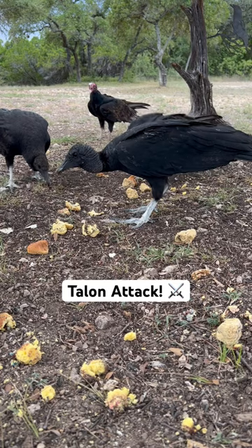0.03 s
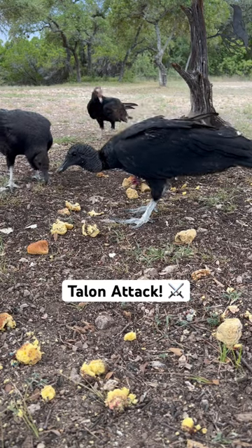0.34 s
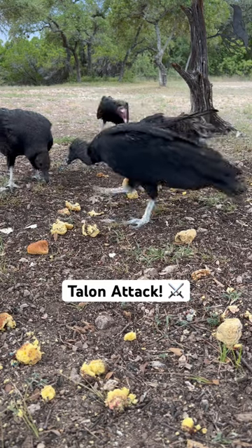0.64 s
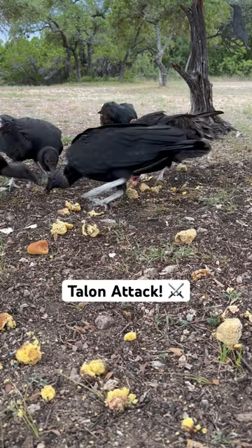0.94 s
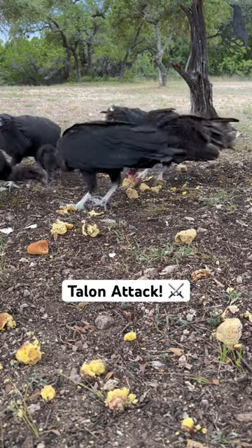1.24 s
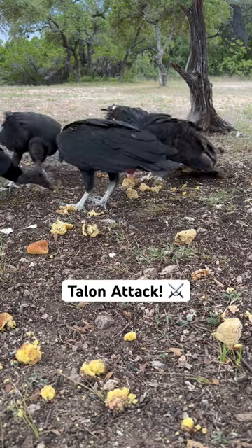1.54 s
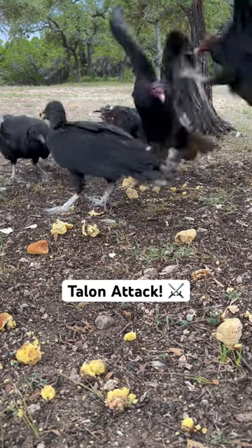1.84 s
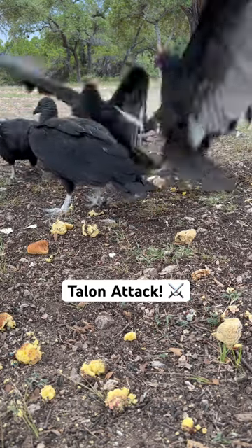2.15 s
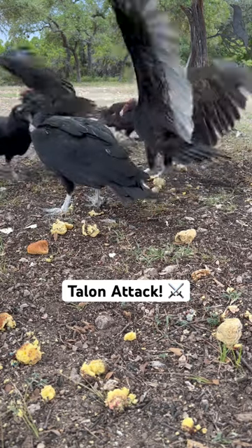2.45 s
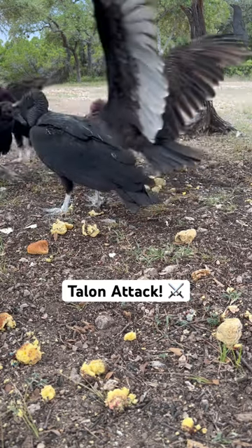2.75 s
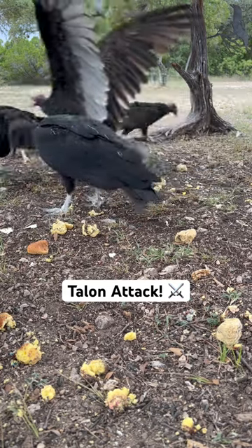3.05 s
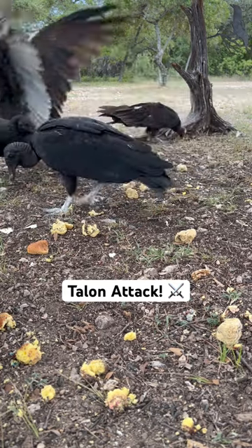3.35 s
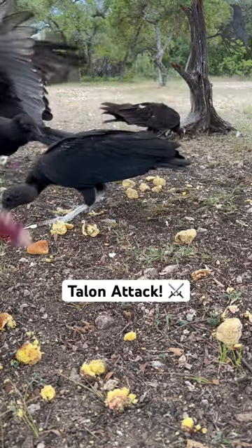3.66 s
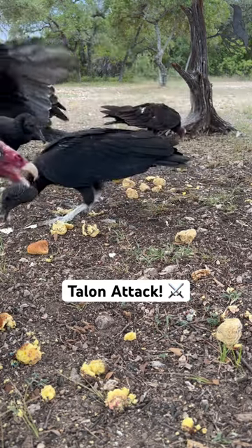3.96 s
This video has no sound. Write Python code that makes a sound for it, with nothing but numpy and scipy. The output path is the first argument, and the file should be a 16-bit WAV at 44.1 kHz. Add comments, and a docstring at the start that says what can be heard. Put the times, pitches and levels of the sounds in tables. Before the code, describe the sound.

Vultures scuffle on dry leaves close to the microphone. Light steps and sharp snaps lead to a brief burst of flapping and wing slaps, then more rustling. A faint small bird whistles far off over a low outdoor breeze.

```python
"""Outdoors, on ground covered with dry leaves, vultures squabble over scraps.
Their feet crush leaves and scrape soil, and their feathers rustle: all showers of tiny clicks.
Beaks and twigs snap. Wings slap in a short fight, and wing beats and steps push puffs of air
at two close microphones. Far off, a small bird whistles over the low rumble of a breeze."""
import sys
import numpy as np
from scipy import signal
from scipy.fft import rfft, irfft
from scipy.io import wavfile

SR = 44100
rng = np.random.default_rng(int(sys.argv[2]) if len(sys.argv) > 2 else 0)


def file_out(sig):
    """Save sig as 16-bit WAV at sys.argv[1]."""
    # one column per channel
    cols = np.atleast_2d(sig).T
    # limit, then scale
    lim = np.clip(cols, -1, 1)
    pcm = np.round(lim * 32767).astype(np.int16)
    wavfile.write(sys.argv[1], SR, pcm)


N = 176400
T = np.arange(N) / SR
HZ = np.fft.rfftfreq(N, 1 / SR)


def from_db(db):
    """Turn decibels into a number to multiply by."""
    return 10 ** (np.asarray(db) / 20)


def unit_power(x):
    """Scale a sound to an average power of 1."""
    return x / np.sqrt(np.mean(x ** 2) + 1e-20)


def over_time(rows):
    """Join (time_s, value) rows with straight lines."""
    return np.interp(T, *np.transpose(rows))


def over_pitch(rows):
    """Join (pitch_hz, value) rows, giving each octave equal room."""
    hz, value = np.transpose(rows)
    return np.interp(np.log(HZ + 1), np.log(hz), value)


def wobble(rate_hz):
    """A random wobble of about size 1, mostly slower than rate_hz."""
    return unit_power(irfft(rfft(rng.standard_normal(N)) / (1 + (HZ / rate_hz) ** 2), N))


def swell(peak_s, rise_s, fall_s):
    """A smooth rise to a peak, then a fade."""
    rising = .5 * ((T - peak_s) / rise_s) ** 2
    falling = np.hypot((T - peak_s) / fall_s, 1) * 2 - 2
    return np.exp(-np.where(T < peak_s, rising, falling).clip(0, 40))


def swells(rows):
    """Add up swells into one loudness curve."""
    return sum(from_db(db) * swell(peak_s, rise_s, fall_s) for peak_s, db, rise_s, fall_s in rows)


def clicks(per_s, uneven_db):
    """Two separate streams of random clicks, some bigger than others."""
    sizes = from_db(uneven_db * np.minimum(rng.exponential(1, (2, N)), 4.5))
    signs = rng.choice([-1, 1], (2, N))
    return unit_power(sizes * signs * (rng.random((2, N)) < per_s / SR))


def resonate(x, hz, width_hz):
    """Make a sound ring at one pitch; a wider ring dies sooner."""
    r = np.exp(-np.pi * width_hz / SR)
    return signal.lfilter([.5, 0, -.5], [1, -2 * r * np.cos(2 * np.pi * hz / SR), r * r], x + 1e-18)


# How alike left and right sound at each pitch: pitch_hz, likeness (1 = the same)
STEREO_LIKENESS = [(60, 1), (200, 1), (400, 0.7), (750, 0.3), (1400, 0.89), (2400, 0.86), (4200, 0.23),
                   (5500, 1), (6300, 0.68), (7600, 0.9), (8800, 0.92), (10200, 1), (11400, 1), (13600, 0.8),
                   (15000, 1)]

def stereo(pair, tone, top_hz=None):
    """Give two streams a tone and blend them into left and right, at power 1."""
    shared, side = rfft(pair) * from_db(over_pitch(tone))
    alike = over_pitch(STEREO_LIKENESS).clip(0, .999)
    both = np.sqrt(1 + alike) * shared + np.sqrt(1 - alike) * side * [[1], [-1]]
    if top_hz:
        both = both / (1 + (HZ / top_hz) ** 4)
    return unit_power(irfft(both, N))


# How hard the birds stir the leaves as they step, fight and settle: time_s, stir_db
STEPPING = [(0.13, -83), (0.334, -68.5), (0.442, -74.5), (0.678, -68.5), (0.856, -66), (1.026, -70),
            (1.316, -68.5), (1.45, -70.5), (1.55, -64)]
FIGHTING = [(1.62, -69), (1.64, -58.5), (1.776, -51.5), (1.858, -55.5), (2.148, -55.5), (2.266, -61.5),
            (3.008, -64), (3.15, -67.5)]
SETTLING = [(3.2, -66.5), (3.28, -59.5), (3.474, -63), (3.56, -64.5), (3.68, -65), (4.0, -63.5)]
# Tone of the stirred leaves: pitch_hz, boost_db
LEAF_TONE = [(200, -10), (600, 0.5), (1400, -2), (2200, -1.5), (3400, -1.5), (5000, 2), (7000, 1),
             (8500, 5), (11500, -1), (15500, 5)]
LEAF_BOOST_DB, TREBLE_HZ, FULL_STIR_DB = 5.5, 10600, -49

def leaf_rustle():
    """Dry leaves crackle and hiss under feet and wing tips, brighter when stirred harder."""
    stir_db = over_time([*STEPPING, *FIGHTING, *SETTLING]) + 2 * wobble(rate_hz=18.4)
    crackle = clicks(per_s=2500, uneven_db=0.5)
    hiss = from_db(4) * rng.standard_normal((2, N))
    big_bits = from_db(-3) * clicks(per_s=150, uneven_db=3)
    leaves = stereo(crackle + hiss + big_bits, LEAF_TONE)
    body = irfft(rfft(leaves) / (1 + (HZ / TREBLE_HZ) ** 10), N)
    treble = from_db(0.27 * (stir_db - FULL_STIR_DB)) * (leaves - body)
    return from_db(LEAF_BOOST_DB + stir_db) * (body + treble)


# Feet landing on leaves: peak_s, level_db, rise_s, fall_s
FOOTFALLS = [(.308, -60, 0.0054, 0.026), (.445, -67, .012, 0.03), (.797, -55.5, 0.0099, 0.013),
             (.853, -74, 0.0046, 0.0092), (.978, -64, 0.0066, 0.0054), (1.053, -57, 0.0095, 0.012),
             (1.384, -59, 0.012, 0.013), (1.67, -54.5, 0.044, .02), (1.767, -42.5, 0.006, 0.0085),
             (1.825, -49, 0.025, 0.028), (2.02, -56.5, 0.028, 0.048), (2.2, -49, 0.017, 0.0082),
             (2.32, -55.5, 0.045, 0.0087), (3.308, -52, 0.021, 0.079), (3.515, -60.5, 0.0039, 0.0058),
             (3.587, -63, .006, 0.021), (3.69, -64, 0.016, 0.047), (3.842, -57, 0.0058, 0.013),
             (3.921, -52.5, 0.029, 0.036)]
# Tone of crushed leaves: pitch_hz, boost_db
CRUNCH_TONE = [(200, 12), (1000, -2), (2500, -5.5), (5000, 4.5), (8000, 4.5), (10500, 7.5), (13000, 4),
               (15500, 1.5)]

def foot_crunches():
    """Each step breaks leaves into a bright shower of bits."""
    return swells(FOOTFALLS) * stereo(clicks(per_s=5000, uneven_db=2.5), CRUNCH_TONE)


# Claws scraping the ground: peak_s, level_db, rise_s, fall_s
SCRAPES = [(.63, -73, 0.018, 0.025), (0.851, -67, 0.0023, 0.0072), (.948, -65.5, 0.018, 0.021),
           (1.07, -67.5, 0.04, 0.063), (1.925, -62.5, .015, .018), (3.375, -64, 0.014, 0.038),
           (3.587, -67, 0.012, .014)]
# Tone of scraped soil: pitch_hz, boost_db
SOIL_TONE = [(200, -6), (1300, 1), (1900, -6.5), (3000, -5), (8000, -28)]

def claw_scrapes():
    """Claws drag through the soil in quick, gritty catches."""
    return swells(SCRAPES) * stereo(clicks(per_s=1500, uneven_db=2.5), SOIL_TONE)


# Feathers sweeping past each other: peak_s, level_db, rise_s, fall_s
WING_SWEEPS = [(.66, -62, 0.014, 0.085), (1.67, -55, 0.075, 0.06), (1.765, -62.5, 0.024, 0.03),
               (1.913, -47, 0.033, 0.044), (2.015, -53.5, 0.0065, 0.015), (2.112, -53.5, 0.038, 0.039),
               (2.2, -49.5, 0.03, 0.14), (3.33, -61.5, 0.082, 0.16), (3.6, -61.5, 0.021, 0.086),
               (3.9, -70, 0.024, 0.07)]
# Tone of the feathers: pitch_hz, boost_db
FEATHER_TONE = [(100, -14), (250, 7.5), (450, 0), (800, -8), (1400, -10.5), (2000, -7.5), (3500, -8.5),
                (7000, -11.5), (15000, -15)]

def feather_rustle():
    """Quills flick over each other in each sweep of a fluttering wing."""
    quills = clicks(per_s=700, uneven_db=1.5)
    hiss = from_db(0.5) * rng.standard_normal((2, N))
    flutter = from_db(1.7 * wobble(rate_hz=70))
    return swells(WING_SWEEPS) * stereo((quills + hiss) * flutter, FEATHER_TONE)


# Beaks and twigs snapping: start_s, level_db, low_ring_db, high_ring_db, splinter_s
# (the two ring levels count from the middle ring)
SNAPS = [(0.1039, -34, -0.5, -7, 0.00019), (.2535, -53, 1, 2, 0.00083), (.4816, -39.5, -5, -11, .0005),
         (.7945, -36, -5, -14, 0.0069), (0.95, -47, -4, 4, 0.00092), (1.0495, -49, 5, -10, .003),
         (1.0694, -43, 0.5, 4.5, 0.0012), (1.382, -52, -1, 4, 0.0014), (1.6006, -36, 0.5, 12, 0.00082),
         (1.86, -45, 5, 4, 0.00055), (1.9105, -49, 9, -2, 0.0006), (2.462, -39.5, -2, 9.5, 0.0012),
         (2.7725, -43, -7.5, 5, 0.0015), (2.9355, -44, -8, 4, 0.00025), (2.938, -45, 6, 0, 0.0016),
         (2.947, -35, -4, 2, 0.0025), (3.5855, -42, 3.5, -6, 0.0006), (3.8332, -44, -11, -7, 0.0007)]
# The low, middle and high ring of a snap: pitch_hz, width_hz
SNAP_RINGS = [(4000, 3500), (7900, 4300), (13000, 22000)]
RING_AVERAGE_DB, GROUND_ECHO_S, TAIL_FADE_S = -26, .003, 0.0059

def snaps():
    """A splintering click rings at three pitches; the ground adds an echo and a faint tail."""
    out, t = np.zeros((2, N)), T[:SR // 20]
    bass_cut = signal.butter(3, 2560, "high", fs=SR, output="sos")
    for start_s, db, low_db, high_db, splinter_s in SNAPS:
        splinters = from_db(-5) * rng.standard_normal(len(t)) * np.exp(-(t / splinter_s) ** 2)
        crack = (t == 0) + splinters
        echo = from_db(-19) * np.roll(crack, int(GROUND_ECHO_S * SR))
        tail = from_db(-21.5) * rng.standard_normal((2, len(t))) * np.exp(-t / TAIL_FADE_S)
        hit = signal.sosfilt(bass_cut, crack + echo + tail)
        i = int(start_s * SR)
        for ring_db, (hz, width_hz) in zip((low_db, 0, high_db), SNAP_RINGS):
            ring = unit_power(resonate(resonate(hit, hz, width_hz), hz, width_hz))
            out[:, i:i + len(t)] += from_db(db + RING_AVERAGE_DB + ring_db) * ring[:, :N - i]
    return out


# Wings and bodies hitting: start_s, peak_db, from_hz, to_hz, length_s
SLAPS = [(0.797, -58, 464, 287, 0.011), (0.949, -60, 1450, 647, 0.012), (1.511, -54, 446, 300, 0.01),
         (1.599, -52, 1500, 920, 0.0057), (1.756, -55, 1105, 600, 0.0089),
         (1.886, -45.5, 1800, 1290, 0.0042), (1.9087, -37.5, 1540, 1200, 0.0051),
         (1.914, -50, 398, 266, 0.013), (1.926, -49.5, 1390, 1210, 0.012), (2.094, -46, 395, 253, 0.021),
         (2.106, -51, 830, 544, 0.013), (2.12, -45, 700, 400, 0.0047), (2.154, -41.5, 373, 292, 0.0093),
         (2.181, -49, 1090, 744, 0.012), (2.208, -43, 876, 530, 0.0062), (2.211, -40, 400, 213, 0.0093),
         (2.246, -45, 880, 250, 0.01), (2.9372, -51, 1870, 1190, 0.0024), (3.195, -48, 545, 186, 0.02),
         (3.306, -49, 447, 320, 0.019), (3.329, -51.5, 373, 271, 0.014), (3.843, -49.5, 392, 288, 0.011)]

def wing_slaps():
    """Soft, ragged blows drop in pitch and die away almost at once."""
    out, t = np.zeros(N), T[:SR // 15]
    ragged = 1 + 0.29 * wobble(rate_hz=600)
    for start_s, db, from_hz, to_hz, length_s in SLAPS:
        i, progress = int(start_s * SR), t / length_s
        hz = from_hz * (to_hz / from_hz) ** progress.clip(0, 1) * ragged[i:i + len(t)]
        loudness = np.sqrt(progress) * np.exp(-2 * progress ** 2)
        blow = loudness * np.sin(2 * np.pi * np.cumsum(hz) / SR)
        out[i:i + len(t)] += from_db(db) * blow / abs(blow).max()
    return out


# Air pushed by wing beats and steps: peak_s, level_db, pitch_hz, rise_s, fall_s
PUFFS = [(0.257, -35.5, 137, 0.0056, 0.0081), (.28, -43, 74, 0.028, 0.028),
         (0.294, -46, 132, 0.016, 0.0083), (0.434, -40, 85.5, 0.01, 0.016), (0.541, -39, 98, 0.004, 0.0032),
         (0.617, -46, 92, 0.0086, 0.009), (1.061, -37.5, 81, 0.0062, 0.016),
         (1.091, -42.5, 133, 0.009, 0.016), (1.129, -33, 69.3, 0.01, 0.016),
         (1.156, -43.5, 132, .008, 0.0094), (1.213, -39.5, 81, 0.0049, 0.009),
         (1.917, -48.5, 153, 0.0065, .01), (2.107, -44, 128, 0.0046, 0.01), (2.179, -36.5, 84, 0.011, 0.01),
         (2.222, -41, 169, 0.0059, 0.017), (2.237, -38.5, 62.4, 0.023, 0.02),
         (2.316, -40, 87.6, 0.0066, 0.008), (2.386, -41, 75, 0.0066, 0.013),
         (2.578, -29, 65.5, 0.0076, 0.018), (2.725, -37, 68, 0.0093, 0.013),
         (2.951, -44, 77, 0.0079, 0.024), (3.134, -42, 112, 0.0062, 0.014)]

def air_puffs():
    """Each push of air is a few slow swings of pressure, heard as a low thump."""
    out = np.zeros(N)
    for peak_s, db, hz, rise_s, fall_s in PUFFS:
        pressure = np.sin(2 * np.pi * (hz * (T - peak_s) + rng.random()))
        out += from_db(db) * swell(peak_s, rise_s, fall_s) * pressure
    return out


# A small bird's sliding notes: start_s, length_s, from_hz, to_hz, level_db
WHISTLES = [(0.342, 0.087, 4950, 3550, -65), (1.202, 0.079, 5300, 3680, -64),
            (1.279, 0.026, 3920, 2660, -59), (1.301, 0.034, 2800, 3780, -61.5)]
RASP_HZ, TREE_FADE_S = 132.5, 0.1

def songbird():
    """A far bird's slightly raspy whistles are blurred by echoes from the trees."""
    song = np.zeros(N)
    for start_s, length_s, from_hz, to_hz, db in WHISTLES:
        progress = ((T - start_s) / length_s).clip(0, 1)
        hz = from_hz + (to_hz - from_hz) * progress ** 0.93 + RASP_HZ * wobble(rate_hz=240)
        loudness = from_db(db) * np.sqrt(abs(np.sin(np.pi * progress)))
        song += loudness * np.sin(2 * np.pi * np.cumsum(hz) / SR)
    trees = rng.standard_normal((2, SR // 3)) * np.exp(-T[:SR // 3] / TREE_FADE_S)
    trees /= np.sqrt(np.sum(trees ** 2) / 2)
    return song + from_db(-7) * signal.fftconvolve(song[None], trees, axes=1)[:, :N]


# The breeze rising and falling: time_s, boost_db
GUSTS = [(0, -3), (.6, -1), (1.45, -1.5), (1.8, -2), (2.3, 3), (2.8, -1.5), (3.4, -1), (4, -2.5)]
# Tones of the rumble and of the far hiss: pitch_hz, boost_db
RUMBLE_TONE = [(15, -46), (25, -43), (40, -6), (62, 0), (80, 1), (100, 1), (125, -4), (160, -7),
               (200, -12.5), (300, -19), (400, -24.5), (600, -32), (900, -33)]
HISS_TONE = [(300, -4), (600, -1), (1250, 5.5), (1800, -4), (3000, 1.5), (5000, -1.5), (8000, -7.5),
             (12000, -17), (16000, -11.5)]
RUMBLE_DB, HISS_DB = -50.5, -71

def breeze():
    """Moving air rumbles in gentle gusts, with a faint, steady hiss far away."""
    loudness = from_db(RUMBLE_DB + over_time(GUSTS) + wobble(rate_hz=14))
    rumble = loudness * stereo(rng.standard_normal((2, N)), RUMBLE_TONE, top_hz=700)
    return rumble + from_db(HISS_DB) * stereo(rng.standard_normal((2, N)), HISS_TONE)


def scene():
    """The vultures up close, with the songbird and the breeze behind them."""
    ground = leaf_rustle() + foot_crunches() + claw_scrapes()
    squabble = feather_rustle() + snaps() + wing_slaps() + air_puffs()
    return ground + squabble + songbird() + breeze()


# Phase shift between left and right, for a wide, slightly hollow sound: pitch_hz, shift_radians
PHASE_SHIFT = [(0, 0), (650, -.8), (1600, 0), (2700, 2.0), (3800, .9), (4400, 1.8), (4900, 1.5),
               (5550, 3.14), (7000, 6.2), (8100, 6.4), (9850, 9.3), (10500, 9.55), (11900, 12.5),
               (13000, 12.6), (14700, 15.6), (16000, 15.8)]
# How much louder the right side is: pitch_hz, boost_db
RIGHT_LOUDER = [(100, -.1), (300, -.6), (600, 1.6), (1400, 0), (2500, 1.9), (4500, 1.3), (6000, .1)]
CUTOFF_HZ, START_S = 15800, .035

def record(dry):
    """Shift the left and right waves apart, tilt their balance and cut the highest treble."""
    side = np.array([[.5], [-.5]])  # left, right
    shift = np.exp(1j * np.interp(HZ, *np.transpose(PHASE_SHIFT)) * side)
    balance = from_db(-over_pitch(RIGHT_LOUDER) * side)
    treble_cut = 1 / np.sqrt(1 + (HZ / CUTOFF_HZ) ** 200)
    fade_in = np.interp(T, [START_S - .002, START_S + .002], [0, 1])
    return irfft(rfft(dry) * shift * balance * treble_cut, N) * fade_in


dry = scene()
out = record(dry)
file_out(out)
```